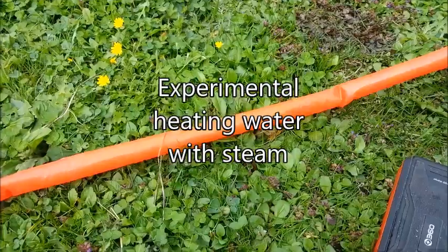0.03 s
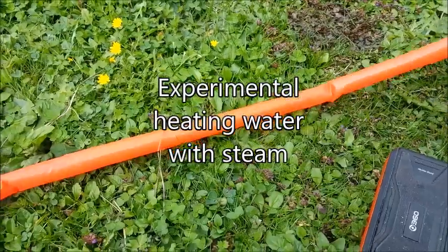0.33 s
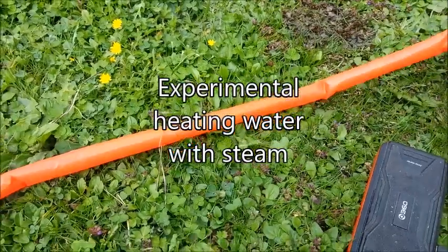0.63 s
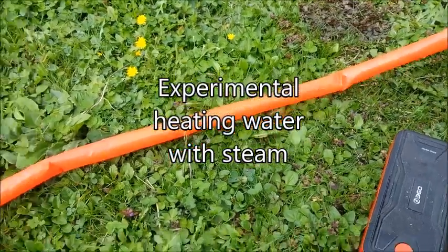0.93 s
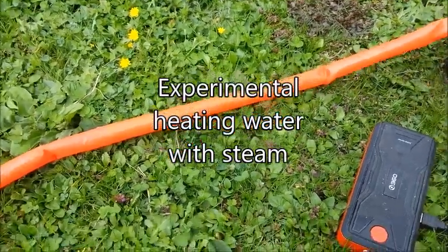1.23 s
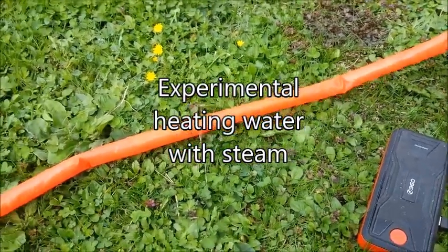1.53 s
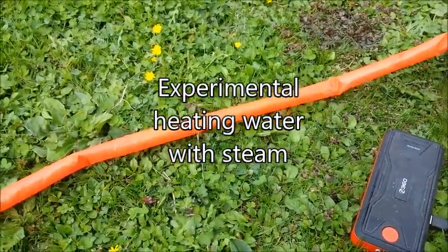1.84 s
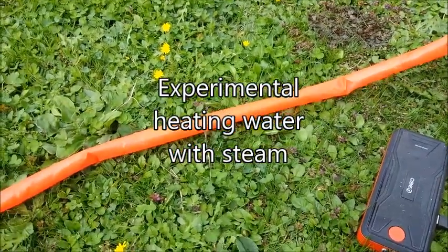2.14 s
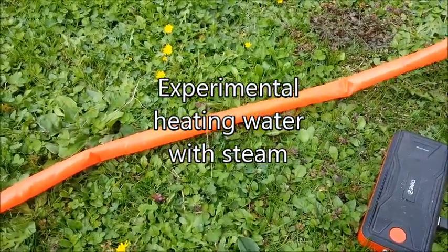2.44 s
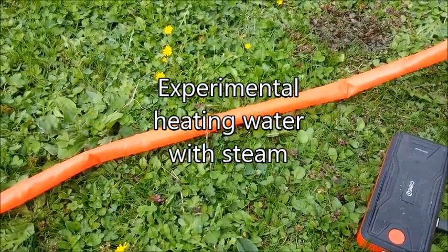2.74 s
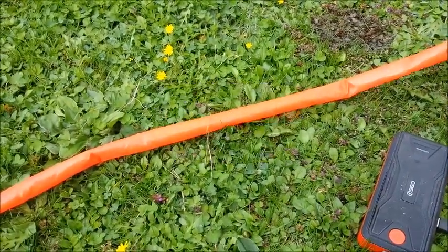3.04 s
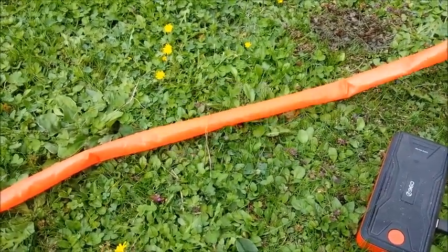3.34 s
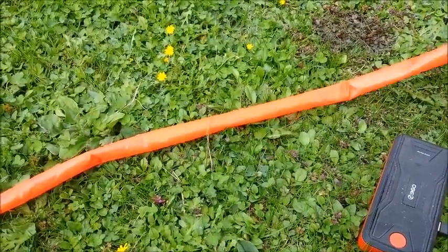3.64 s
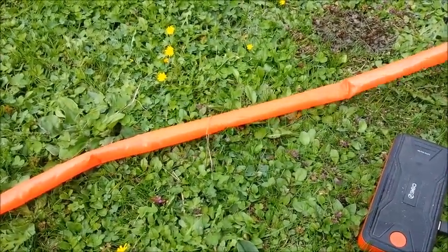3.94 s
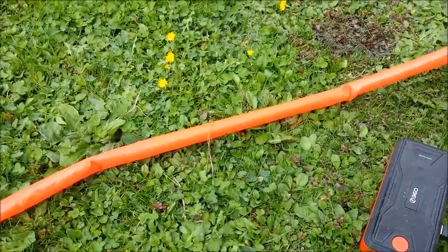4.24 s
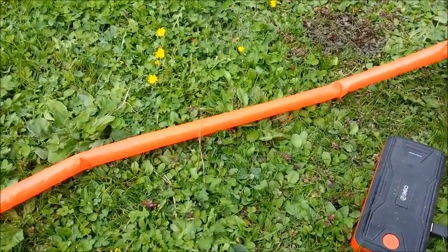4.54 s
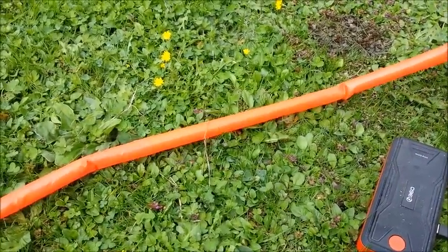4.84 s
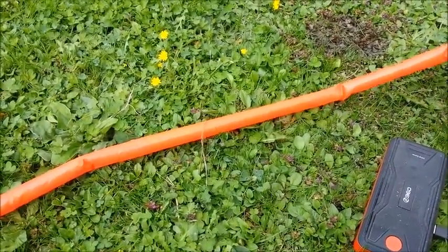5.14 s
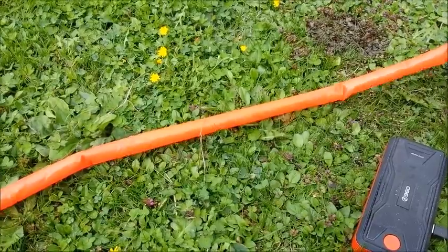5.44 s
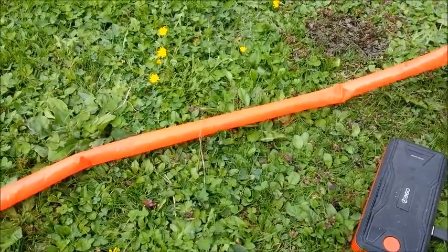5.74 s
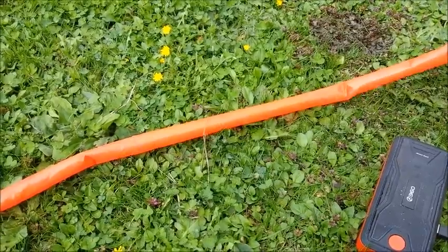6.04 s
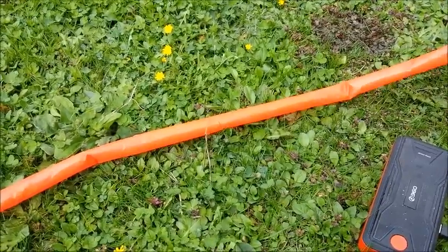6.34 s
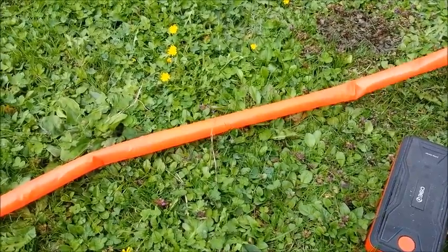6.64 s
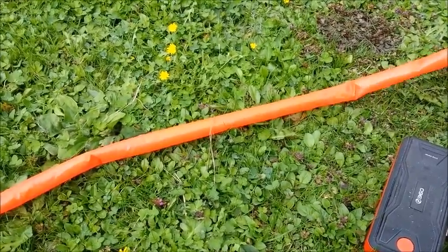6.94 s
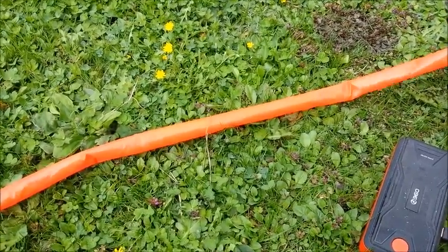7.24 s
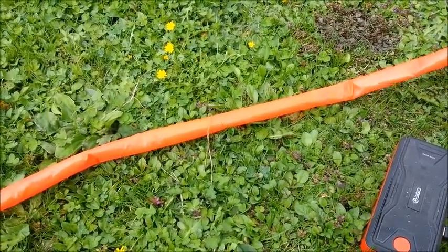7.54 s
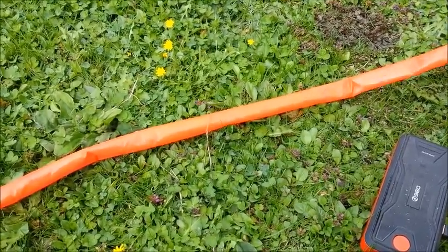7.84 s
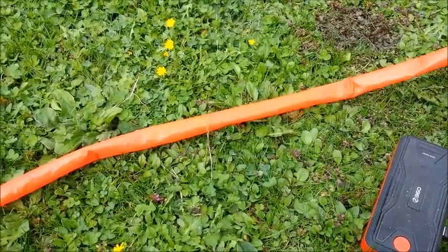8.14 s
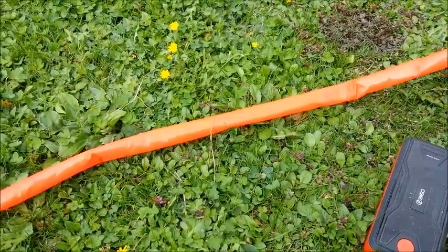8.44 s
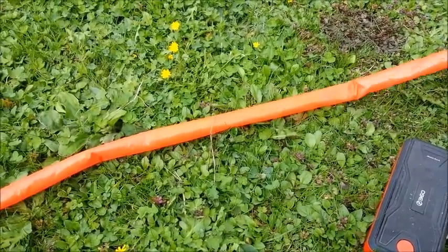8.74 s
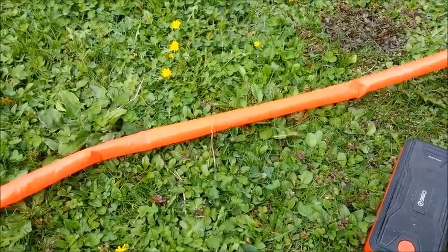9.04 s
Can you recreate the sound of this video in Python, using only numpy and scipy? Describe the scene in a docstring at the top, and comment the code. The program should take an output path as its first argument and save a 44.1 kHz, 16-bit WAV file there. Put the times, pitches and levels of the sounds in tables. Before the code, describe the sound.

Out of near silence, steam swells through a soft hose on a lawn and bubbles into water, making a low rumble under a turbulent hiss and thin whine. Early on, the hand-held microphone pops, is knocked and briefly rubbed. The rush sinks at a loud pop, recovers and holds steady, with small ticks, soft bubble taps and very faint, distant bird whistles.

```python
"""A rush of steam swells out of near silence: it runs through a soft hose on a lawn and condenses in water.
Collapsing bubbles rumble and tap under the jet's turbulent hiss and a thin whine; the rush sinks once
and recovers. Early on, the hand-held phone pops, takes a knock that rings its case, and is rubbed by a
finger. Small ticks, flares of hiss, puffs of wind and a few faint, far bird whistles come and go."""
import sys
import numpy as np
from scipy import signal
from scipy.fft import rfft, irfft, next_fast_len
from scipy.io import wavfile

SR = 44100
rng = np.random.default_rng(int(sys.argv[2]) if len(sys.argv) > 2 else 0)


def dump_mix(stems):
    """Bounce the given channels to the path in sys.argv[1] as a 16-bit WAV at rate SR."""
    frames = np.atleast_2d(stems).T  # one column per channel
    limited = np.clip(frames, -1, 1)  # hard clip at full scale
    pcm = np.round(limited * 32767).astype(np.int16)
    wavfile.write(sys.argv[1], SR, pcm)


N = 405279
TIME, SIZE = np.arange(N) / SR, next_fast_len(N, True)
FREQ = np.fft.rfftfreq(SIZE, 1 / SR) + 1e-3
START_S = .418  # the steam sets in

# Tone of the bubbling water. Each row: frequency in Hz, level in dB per Hz.
RUMBLE_EQ = [(10, -99), (40, -84.5), (90, -66), (130, -61.5), (190, -60.5), (320, -62.5), (440, -71.5),
             (560, -65), (660, -66.5), (790, -72.5), (920, -86), (1200, -88.5), (3000, -125)]
# Tone of the jet. Each row: frequency in Hz, left and right level in dB per Hz, share common to both sides.
HISS_EQ = [(20, -100, -89, 0), (200, -75.5, -78.5, 0.05), (610, -75, -78.5, 0.35), (1100, -89, -89, 0.52),
           (1860, -84.5, -87.5, 0.1), (2880, -86.5, -78, 0.7), (3520, -87, -80, 0.01),
           (4150, -83.5, -81, 0), (4700, -84.5, -77, 0.95), (5570, -85.5, -78, 0.73),
           (6410, -91, -81, 0.09), (8070, -99, -90.5, 0.3), (10160, -101, -97, 0),
           (15500, -102.5, -100.5, 0.1)]
# Peaks and notches on that tone. Each row: centre in Hz, width in Hz, left and right gain in dB.
HISS_PEAKS = [(985, 81, 3.5, 2.5), (1432, 133, 5, 9.5), (2102, 237, 5.5, 9.5), (2365, 125, -16, 2),
              (3200, 390, -3.5, -6), (4274, 240, -5.5, -5.5), (5320, 220, -5, -1.5), (6220, 240, 5.5, 5.5),
              (6596, 370, 2.5, 7)]
# Path of the whine. Each row: time in seconds, pitch in Hz.
WHINE_PITCH = [(.5, 2397), (6.0, 2413), (6.8, 2404), (9.19, 2420)]
# Partials of the whine. Each row: multiple of the pitch, level in dB.
WHINE_PARTIALS = [(1, -59), (2, -63)]
# Flares of hiss. Each row: start and length in seconds, centre and width in Hz, level in dB.
FLARES = [(.58, 0.59, 5600, 3200, -43), (5.6, 3.3, 3810, 460, -54), (6.63, 0.57, 7900, 3500, -51.5),
          (8.8, .5, 4700, 440, -49.5)]
# Larger bubbles collapsing. Each row: time in seconds, level in dB.
BUBBLE_TAPS = [(3.544, -27), (4.770, -31), (5.671, -35), (5.886, -33), (8.465, -32)]
# Microphone pops. Each row: start in seconds, level in dB, left minus right in dB, bass cut in Hz.
MIC_POPS = [(0.676, -17.5, 40, 110), (.680, -6.5, -40, 104), (1.9166, -8, -45, 85), (1.9218, 4, -47, 82.5),
            (1.9431, -15, -40, 110)]
# A knock on the phone and its rebound. Each row: start in seconds, level in dB.
KNOCKS = [(.862, -6.5), (0.8681, -21.5)]
# Ring of the case. Each row: pitch in Hz, seconds to fall 60 dB, left and right gain in dB.
CASE_MODES = [(184, 0.016, -34, -1), (480, 0.015, -10, -29), (770, 0.012, -17, -5.5),
              (1300, 0.025, -14, -38), (2450, 0.0062, -11.5, -23), (6700, 0.0062, -32, -3)]
# Bright ticks. Each row: start in seconds, level in dB, centre in Hz.
TICKS = [(1.021, -33, 13000), (1.5592, -24, 12800), (2.745, -40, 13000), (3.481, -29, 9000),
         (4.643, -30, 9500), (4.98, -24, 11000), (5.4115, -17.5, 14200), (6.8823, -26, 8450),
         (7.1949, -38, 14000), (7.809, -27, 14600)]
# Puffs of wind. Each row: start and length in seconds, centre in Hz, level in dB.
WIND_PUFFS = [(7.125, 0.067, 75, -27), (7.345, .07, 48, -42)]
# Far bird whistles. Each row: start and length in seconds, opening pitch in Hz, level in dB.
BIRD_CALLS = [(3.202, 0.28, 1660, -60), (3.502, .26, 1466, -60.5), (5.044, 0.3, 1700, -60),
              (5.192, .24, 1310, -58), (7.419, 0.23, 1310, -58), (8.783, .24, 1680, -61),
              (9.038, 0.26, 1490, -53)]


def bubbles(per_second=420, scatter_db=2.5, surge_db=0.16):
    """The low bed: each collapsing steam bubble gives a suction pulse; churning water fills the gaps."""
    collapses = rng.random(N) < per_second / SR
    pulses = -1. * collapses * undb(scatter_db * rng.standard_normal(N))
    churn = rng.standard_normal(N)
    drive = unit(unit(pulses - pulses.mean()) + churn)
    water = shape(drive, undb(spectrum(*np.transpose(RUMBLE_EQ))) * np.sqrt(SR / 2))
    return mic_pair(water * undb(surge_db * wander(18)), lag_ms=0.16) * pan(-0.55)


def jet(flutter_db=.5, flicker_db=1.5, bands=14):
    """Turbulent hiss with a few resonances; part arrives directly, part scattered from all round."""
    hz, left, right, common = np.transpose(HISS_EQ)
    common = np.clip(spectrum(hz, common), 0, 1)
    peaks_db = sum(np.array([[left_db], [right_db]]) / (1 + (2 * (FREQ - centre) / width) ** 4)
                   for centre, width, left_db, right_db in HISS_PEAKS)
    colour = undb(np.array([spectrum(hz, left), spectrum(hz, right)]) + peaks_db) * np.sqrt(SR / 2)
    direct = shape(mic_pair(rng.standard_normal(N)), colour * np.sqrt(common))
    scattered = shape(rng.standard_normal((2, N)), colour * np.sqrt(1 - common))
    # eddies of each size come and go, so the bands flicker a little, the treble most
    band_position = np.sqrt(FREQ / FREQ[-1]) * (bands - 1)
    out = 0
    for k in range(bands):
        strip = shape(direct + scattered, np.maximum(1 - np.abs(band_position - k), 0))
        out += strip * undb(flicker_db * k / bands * wander(16))
    return out * undb(flutter_db * wander(30))


def whine(wobble_hz=3, flicker_db=3.0):
    """A thin, slightly unsteady tone and its octave ride on the flow."""
    hz = np.interp(TIME, *np.transpose(WHINE_PITCH)) + wobble_hz * wander(25)
    phase = 2 * np.pi * np.cumsum(hz) / SR
    tone = sum(undb(db) * unit(np.sin(multiple * phase)) for multiple, db in WHINE_PARTIALS)
    return mic_pair(tone * undb(flicker_db * wander(4))) * pan(-11)


def flares():
    """The jet hisses louder in one band for a while."""
    return pan(-10) * sum(undb(db) * grainy(hz, width) * arch(start, length)
                          for start, length, hz, width, db in FLARES)


def bubble_taps():
    """A larger bubble gives one suction pulse, a soft tap that stands out of the rumble."""
    out = 0
    for start, db in BUBBLE_TAPS:
        suction = -1. * (np.arange(N) == round(start * SR))
        tap = shape(suction, band(hz=500, width=700) ** 2)
        out += undb(db) * tap / np.abs(tap).max()
    return mic_pair(out, lag_ms=0.16)


def steam_fader(dip_start_s=1.813, fall_s=0.52, hold_s=0.4, recover_s=0.27, dip_db=-9, floor_db=-69):
    """The rush rises out of near silence; later it sinks, stays low briefly and recovers."""
    rise = 0.04 * ramp(START_S, .008) + 0.96 * ramp(START_S, 0.26)
    since_hold = np.maximum(TIME - dip_start_s - fall_s - hold_s, 0)
    dip = ramp(dip_start_s, fall_s) * np.exp(-since_hold / recover_s)
    return undb(floor_db) + rise * undb(dip_db * dip)


def mic_pops():
    """Each pop is a pressure step; the microphone's bass cut turns it into a spike and an undershoot."""
    out = 0
    for start, db, pan_db, hz in MIC_POPS:
        omega = 2 * np.pi * hz
        bass_cut = signal.bilinear([1, 0, 0], [1, omega, omega ** 2], SR)
        spike = signal.lfilter(*bass_cut, 1. * (TIME >= start))
        out += undb(db) * pan(pan_db) * spike
    return out


def knocks(crack_db=-17, crack_t60=0.034):
    """A hard contact gives a crack and rings the phone's case."""
    crack = unit(shape(rng.standard_normal((2, N)), band(hz=3300, width=3500))) * undb(crack_db) * pan(-14)
    out = 0
    for start, db in KNOCKS:
        ring = sum(undb([[left], [right]]) * decay(start, t60) * np.sin(2 * np.pi * hz * (TIME - start))
                   for hz, t60, left, right in CASE_MODES)
        out += undb(db) * (ring + crack * decay(start, crack_t60))
    return out


def ticks():
    """Tiny dry snaps: a few milliseconds of high noise with a lower body."""
    body = undb(-2) * band(hz=4600, width=9200)
    out = 0
    for start, db, hz in TICKS:
        burst = rng.standard_normal((2, N)) * decay(start, t60=0.0066)
        snap = shape(burst, band(hz, width=4400) ** 2 + body)
        out += undb(db) * snap / np.abs(snap).max()
    return out * pan(-11)


def finger_rub():
    """A finger slides on the case: a dull rustle, and a bright scrape by the right microphone."""
    rustle = undb(-44) * pan(3) * grainy(hz=2020, width=2640)
    scrape = undb(-49.5) * pan(-15) * grainy(hz=8500, width=9000)
    return (rustle + scrape) * arch(start=0.813, length=0.32)


def wind():
    """Each puff is a brief low flutter on the right microphone."""
    return pan(-30) * sum(undb(db) * grainy(hz, 0.83 * hz) * arch(start, length)
                          for start, length, hz, db in WIND_PUFFS)


def bird(fall_octaves_per_s=0.51, waver_hz=20, flicker_db=2):
    """Whistles that all fall at the same rate, blurred by distance."""
    waver = waver_hz * wander(60)
    out = 0
    for start, length, opening_hz, db in BIRD_CALLS:
        hz = opening_hz * 2 ** (-fall_octaves_per_s * length * ramp(start, length)) + waver
        swell = np.sqrt(2 * np.abs(arch(start, length)))
        out += undb(db) * swell * np.sin(2 * np.pi * np.cumsum(hz) / SR)
    return out * undb(flicker_db * wander(20)) * pan(2)


def undb(db):
    """Decibels to gain."""
    return 10 ** (np.asarray(db) / 20)


def unit(x):
    """Scale to a spread of 1."""
    return x / np.std(x)


def spectrum(hz, values):
    """An EQ curve: points joined on a log-frequency axis."""
    return np.interp(np.log(FREQ), np.log(hz), values)


def shape(x, response):
    """Filter by a frequency response."""
    return irfft(rfft(x, SIZE) * response, SIZE)[..., :N]


def band(hz, width):
    """Response of a resonance, gain 1 at its centre; width in Hz."""
    return 1 / (1 + 1j * (FREQ ** 2 - hz ** 2) / (FREQ * width))


def wander(rate_hz, points=4000):
    """Random modulation: levels joined by straight lines, spread 1."""
    return unit(np.interp(2 * rate_hz * TIME, np.arange(points), rng.standard_normal(points)))


def grainy(hz, width, grain_db=2):
    """Grainy noise in one band, a separate noise for each microphone."""
    noise = shape(rng.standard_normal((2, N)), band(hz, width) ** 2)
    return unit(noise * undb(grain_db * wander(150)))


def pan(left_minus_right_db):
    """Left and right gains, the louder side at 1."""
    return undb(np.minimum([[left_minus_right_db], [-left_minus_right_db]], 0))


def mic_pair(x, lag_ms=0.15):
    """Sound reaches the right microphone a little after the left one."""
    return np.array([x, shape(x, np.exp(-2j * np.pi * FREQ * lag_ms / 1000))])


def ramp(start, length):
    """Straight rise from 0 to 1."""
    return np.clip((TIME - start) / length, 0, 1)


def arch(start, length):
    """Rounded fade in and out."""
    return np.sin(np.pi * ramp(start, length))


def decay(start, t60):
    """Hard attack, then a tail that falls 60 dB in t60 seconds."""
    age = TIME - start
    return (age >= 0) * np.exp(-np.minimum(np.log(1000) * np.abs(age) / t60, 60))


def scene(early_bubbles_db=-4, early_hiss_db=0.8, swell_db=0.94):
    """The mix: the steam starts with more hiss and less bubbling; the small sounds sit around it."""
    early = 1 - ramp(START_S, length=1.14)
    rumble = bubbles() * undb(early_bubbles_db * early + swell_db * arch(start=3.63, length=3.5))
    hiss = (jet() + whine()) * undb(early_hiss_db * early)
    steam = (rumble + hiss + flares() + bubble_taps()) * steam_fader()
    return steam + mic_pops() + knocks() + ticks() + finger_rub() + wind() + bird()


def record(dry, ceiling=.92, top_hz=15500):
    """The loudest pop clips; a steep low-pass takes off the very top."""
    clipped = np.clip(dry, -ceiling, ceiling)
    return signal.sosfilt(signal.ellip(8, .2, 70, top_hz, fs=SR, output="sos"), clipped)


dry = scene()
out = record(dry)
dump_mix(out)
```